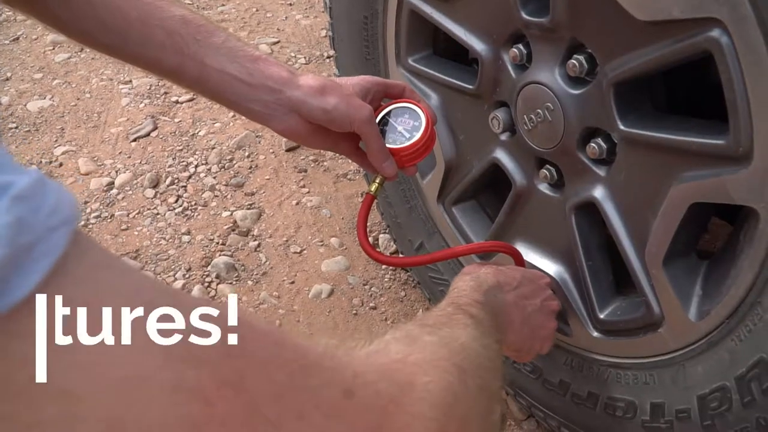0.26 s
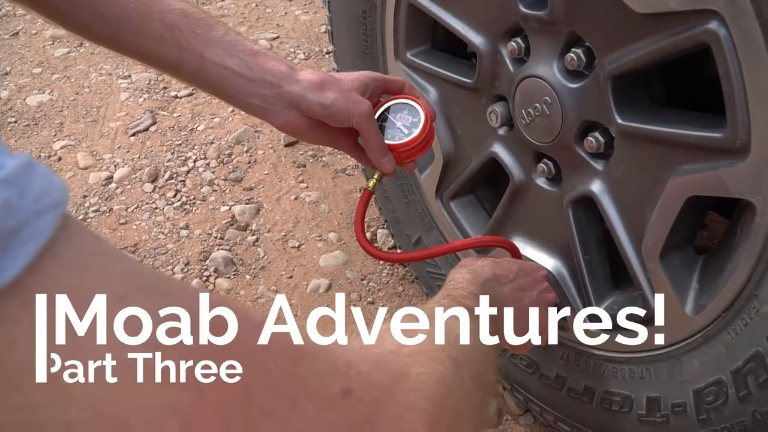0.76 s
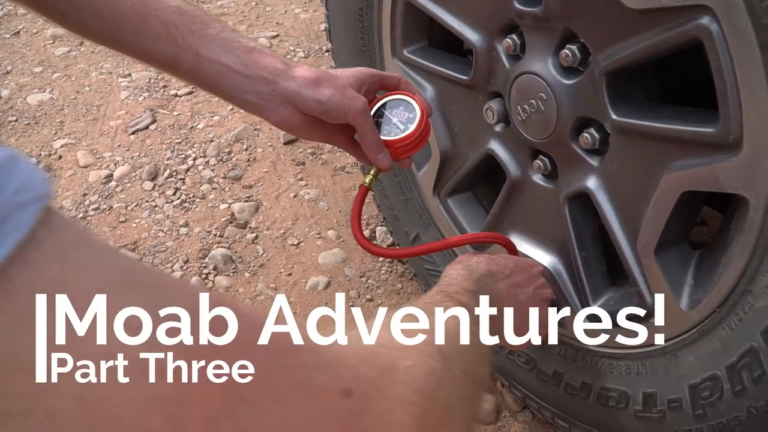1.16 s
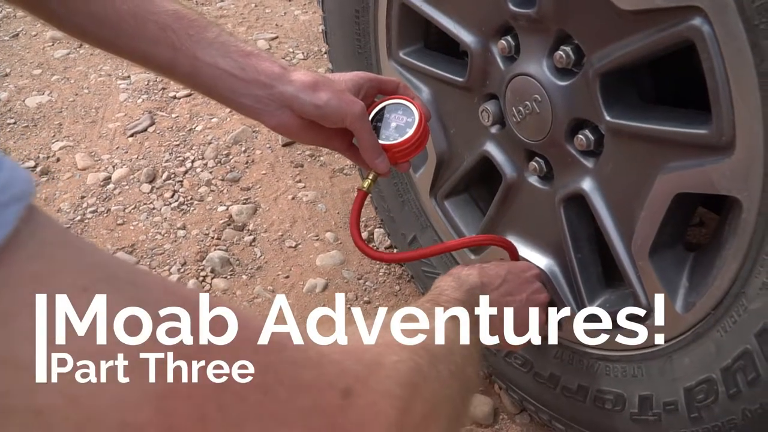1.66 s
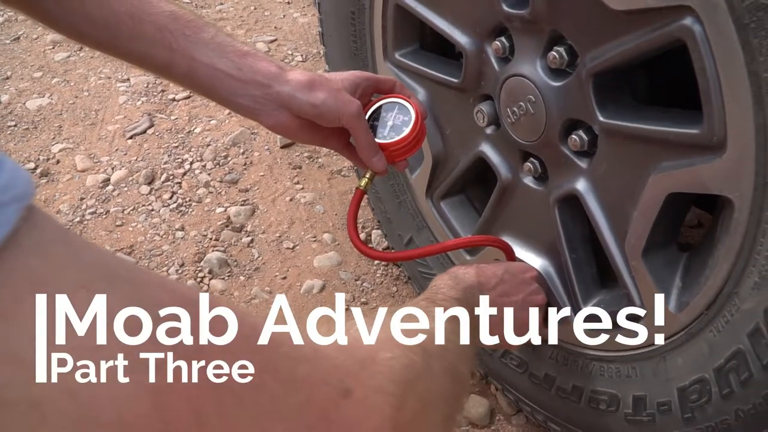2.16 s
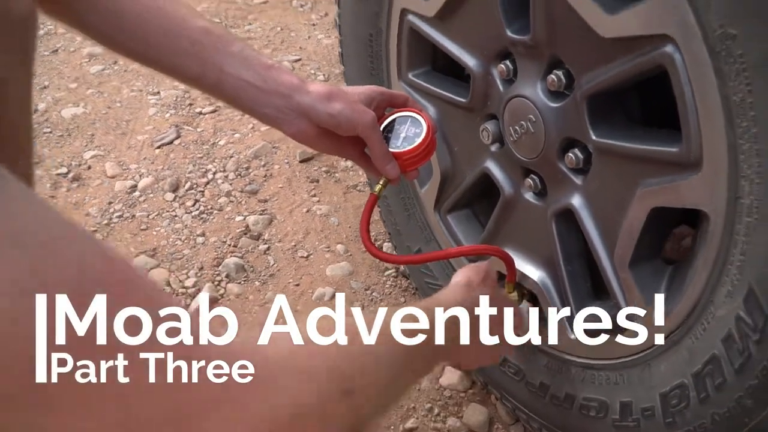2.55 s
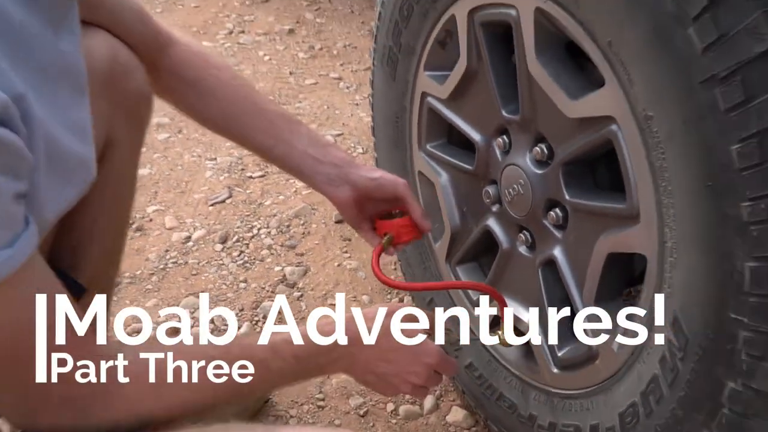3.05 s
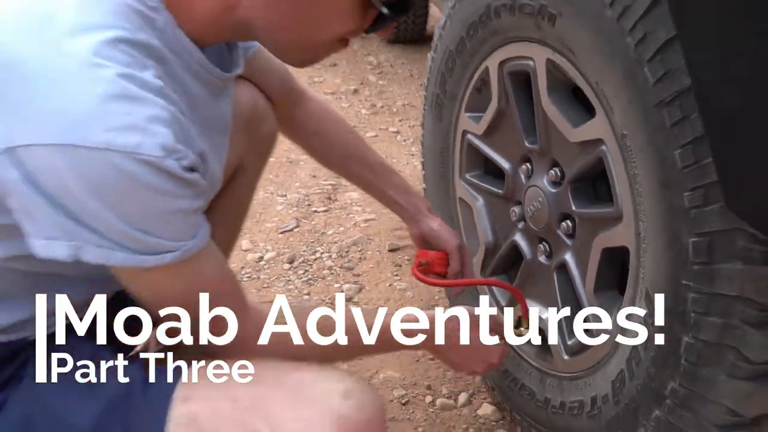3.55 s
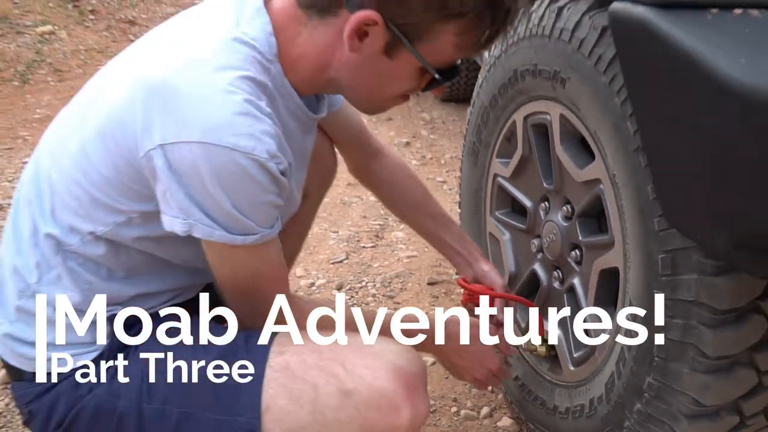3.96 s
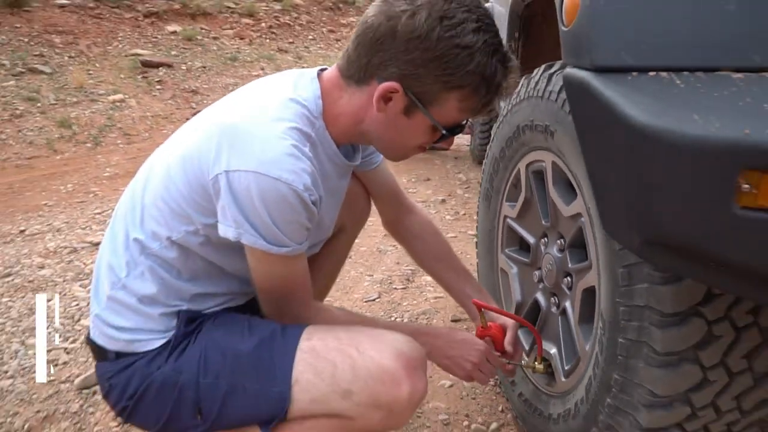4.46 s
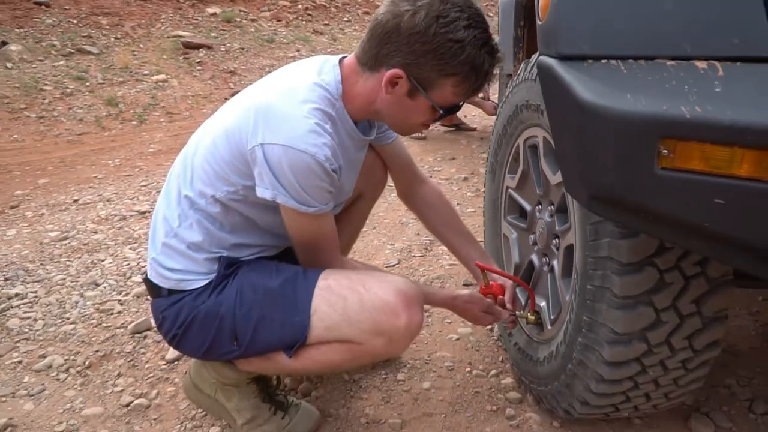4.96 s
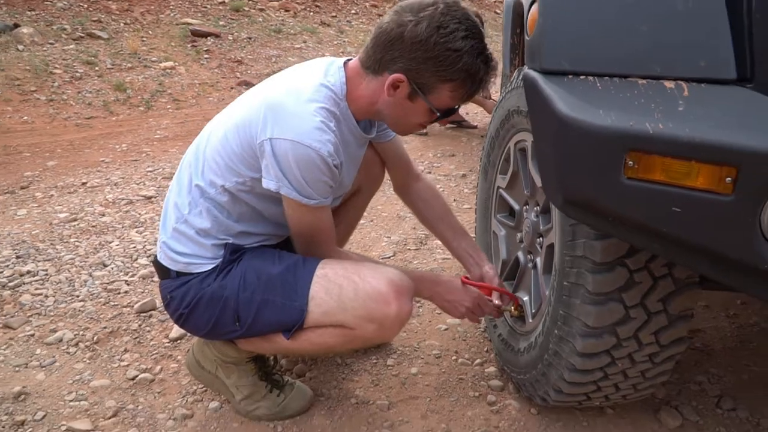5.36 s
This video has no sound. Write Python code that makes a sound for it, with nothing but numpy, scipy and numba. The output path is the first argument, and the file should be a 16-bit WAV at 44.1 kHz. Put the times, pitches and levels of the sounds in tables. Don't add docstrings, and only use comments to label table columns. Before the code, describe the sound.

Air rushes sharply out of a tyre, abruptly shrinks to a weak hiss, fingers click on brass, and a softer second hiss dies away outdoors.

```python
import sys
import numpy as np
from scipy import signal
from scipy.fft import rfft, irfft, next_fast_len
from scipy.io import wavfile
from scipy.ndimage import uniform_filter1d
from numba import njit

SR = 44100
rng = np.random.default_rng(int(sys.argv[2]) if len(sys.argv) > 2 else 0)


def convert_level_to_amplitude(level_db):
    exponent = np.asarray(level_db, float) / 20
    return 10 ** exponent


def dump_mix(stems):
    frames = np.atleast_2d(stems).T
    limited = np.clip(frames, -1, 1)
    pcm = np.round(limited * 32767).astype(np.int16)
    wavfile.write(sys.argv[1], SR, pcm)


N = 247621
TIME = np.arange(N) / SR
RING_TIME = np.arange(4096) / SR
SHUT_S = 1.617
REGION_EDGES_HZ = (6500, 10500, 13700)


def read(table, hold=False):
    s, *columns = np.transpose(table)
    inside = np.clip(np.minimum(TIME - s[0], s[-1] - TIME) / .03 + 1, 0, 1)
    return [np.interp(TIME, s, column) for column in columns] + [1. if hold else inside]


def unit(x):
    return x / np.sqrt(np.mean(x ** 2))


def coloured(shape, bumps=(), edges_hz=(), noise=None):
    if noise is None:
        noise = rng.standard_normal(N)
    size = next_fast_len(N, real=True)
    hz = np.fft.rfftfreq(size, 1 / SR) + 1e-3
    shape_hz, shape_db = np.transpose(shape)
    db = np.interp(np.log(hz), np.log(shape_hz), shape_db)
    db = db - 24 * np.clip(np.log2(shape_hz[0] / hz), 0, 5)
    grid = hz[::32]
    lift_db = np.zeros(len(grid))
    for centre, width, lift in bumps:
        lift_db += lift / (1 + (2 * (grid - centre) / width) ** 2)
    spectrum = rfft(noise, size) * convert_level_to_amplitude(db + np.interp(hz, grid, lift_db))
    below = [0] + [1 / (1 + (hz / edge) ** 12) for edge in edges_hz] + [1]
    return [irfft(spectrum * (b - a), size)[:N] for a, b in zip(below, below[1:])]


def walk(rate):
    k = int(SR / rate)
    steps = np.repeat(rng.standard_normal(N // k + 1), k)
    return 1.43 * uniform_filter1d(uniform_filter1d(steps, k), k)[:N]


@njit
def svf(x, hz, q):
    y, b, l, k = np.empty(len(x)), 0., 0., 1 / q
    for i in range(len(x)):
        g = np.tan(np.pi * hz[i] / SR)
        v = (b + g * (x[i] - l)) / (1 + g * (g + k))
        b, l, y[i] = 2 * v - b, l + 2 * g * v, k * v
    return y


def valve():
    return gush() + leak() + seep() + peep() + last_puff()


def gush():
    # t/s, level/dB
    flow = [
        (0.0, -22.5),
        (0.35, -20),
        (1.6, -20.5),
    ]
    # f/Hz, level/dB
    shape = [(150, -25.5), (300, -19.5), (700, -14), (1500, -16), (2400, -13), (3000, -19.5), (5500, -16),
             (8500, 0), (10500, -19), (12500, -12.5), (15600, -19)]
    # f/Hz, width/Hz, level/dB
    bore = [(279, 32, -6), (326, 15, 7.5), (761, 57, 5), (870, 34, -2.5), (983, 18, 5.5), (1170, 15, 2.5),
            (1970, 99, 5.5)]
    # f/Hz, width/Hz, early level/dB, late level/dB
    wheel = [(3160, 110, -4.5, -1.0), (3350, 90, 4.0, 4.0), (3760, 330, 5.5, 7.5), (4020, 470, -7.0, -9.0),
             (4840, 120, -3.5, -4.5), (5140, 200, -4.5, -8.0), (5320, 110, 5.0, 3.5), (5700, 170, 6.5, 4.5),
             (5900, 210, -6.0, -5.0), (6330, 140, 3.5, 6.0), (6340, 580, -9.0, -6.0), (6560, 180, 5.0, 2.0),
             (6740, 190, -5.5, -7.0), (7030, 250, -7.5, -8.0), (7160, 160, 1.0, 4.5),
             (7400, 550, -8.0, -11.5), (7930, 210, -8.5, -6.0), (8520, 490, -13.5, -13.5),
             (8960, 760, 4.5, 7.0), (9080, 140, -9.5, -14.0), (9410, 420, -10.5, -4.5),
             (9610, 200, 9.5, -3.5), (9820, 200, -0.5, 4.0), (10040, 200, 1.5, -2.5),
             (10330, 470, 7.5, 8.0), (10350, 130, -9.5, -6.0), (10710, 220, 6.5, -5.0),
             (10930, 210, -4.5, 3.0), (11170, 150, 3.0, -2.0), (11290, 380, 2.5, 4.0),
             (11830, 210, 2.0, -2.5), (12100, 430, 7.0, 3.0), (12480, 100, 0.0, 2.5),
             (13050, 430, 5.5, 6.5), (13890, 900, 3.5, 9.0), (14030, 300, -2.0, -11.5),
             (14610, 130, -7.0, -1.5), (14750, 220, -1.5, -6.5), (15370, 350, -1.5, -3.5),
             (15600, 180, 0.5, 3.0)]
    bands = creeping(shape, bore, wheel, (0, 1.6))
    sound = jet(flow, bands, (-3.5, -.4, -7.6), np.zeros(3),
                flutter_db=.5, flicker_db=.15, haze_db=-17, hold=True)
    late = np.clip(TIME - SHUT_S, 0, None)
    fall, tail = np.exp(-late / .0012), convert_level_to_amplitude(-13.5) * np.exp(-late / .064)
    return sound * np.maximum(fall, tail)


def leak():
    # t/s, level/dB
    flow = [
        (1.63, -36),
        (1.89, -33.5),
        (2.41, -33),
        (2.63, -38.5),
        (2.79, -47.5),
        (2.88, -50.5),
        (2.9, -55),
    ]
    # f/Hz, level/dB
    shape = [(150, -25), (300, -15), (700, -28), (1500, -24.5), (2400, -15), (3000, -7.5), (5500, -15),
             (8500, 0), (10500, -2.5), (12500, -2), (15600, -15)]
    # f/Hz, width/Hz, level/dB
    bore = [(1145, 120, 11), (2240, 250, 1.5)]
    # f/Hz, width/Hz, early level/dB, late level/dB
    wheel = [(2820, 150, -3.5, -5.0), (2960, 100, 6.5, 3.0), (3210, 560, -4.0, -1.5), (3760, 580, 3.0, 4.5),
             (4480, 90, -1.5, -6.0), (4580, 100, 6.0, 4.5), (4910, 130, 6.0, 6.5), (5270, 230, 5.5, 3.0),
             (6190, 170, -6.5, -6.0), (6710, 150, 3.0, 3.0), (6850, 110, -5.5, -4.0), (7230, 160, 2.0, 5.5),
             (8060, 900, -13.0, -14.0), (8070, 310, 14.0, 13.0), (8530, 160, 5.5, 3.5),
             (8640, 320, -2.0, -4.5), (9070, 90, -3.5, -1.5), (9540, 230, -8.5, -9.5),
             (9860, 110, 0.5, 4.0), (10020, 90, -8.5, -4.5), (11010, 590, -6.0, -7.0),
             (11980, 200, 3.5, 4.0), (12320, 170, 4.5, 4.5), (12420, 180, -4.0, -2.5),
             (13170, 250, -5.0, -6.5), (13710, 160, -6.5, -5.5), (14190, 370, -10.0, -8.0),
             (14450, 900, 4.0, 5.0), (14560, 100, -5.0, -6.0), (15110, 680, -6.5, -6.0)]
    bands = creeping(shape, bore, wheel, (1.68, 2.52))
    return jet(flow, bands, (-3, .44, -7), (.37, .028, .55), flutter_db=.6, flicker_db=.25, haze_db=-15)


def seep():
    # t/s, level/dB
    flow = [
        (3.55, -58),
        (3.56, -45),
        (3.6, -38.5),
        (3.75, -35.5),
        (4.18, -34),
        (4.68, -34.5),
    ]
    # f/Hz, level/dB
    shape = [(150, -16), (300, -18.5), (700, -17), (1500, -15.5), (2400, -13), (3000, -4), (5500, -18.5),
             (8500, 0), (10500, -19), (12500, -5), (15600, -21.5)]
    # f/Hz, width/Hz, level/dB
    bore = [(1900, 300, 5), (2400, 116, -1)]
    # f/Hz, width/Hz, early level/dB, late level/dB
    wheel = [(2540, 170, 5.5, 2.0), (2680, 290, -2.5, -5.5), (3130, 90, -7.0, -6.0), (3350, 460, 0.5, -4.0),
             (3880, 90, -1.5, -6.5), (4620, 110, 3.5, 6.5), (4900, 210, 8.0, 5.0), (5640, 880, 11.5, 14.0),
             (5780, 240, -7.0, -8.0), (6540, 300, -1.0, -6.5), (7000, 120, -2.5, -4.0),
             (7240, 130, 3.5, 3.0), (7530, 260, -4.0, -6.0), (8290, 90, -4.5, -3.5), (8840, 90, 2.5, 4.5),
             (9090, 520, -3.0, -7.0), (9480, 140, -2.0, -5.0), (9610, 120, -0.5, 5.5),
             (10020, 170, -0.5, -7.5), (10160, 730, 7.0, 10.5), (10650, 240, -0.5, 6.5),
             (11520, 200, -3.5, -2.5), (12380, 220, -7.0, 2.0), (12680, 90, 2.5, -7.0),
             (12860, 150, -7.5, 4.5), (13900, 120, 3.5, -5.5), (14240, 510, 4.0, 3.5),
             (15650, 900, 3.0, 6.0)]
    bands = creeping(shape, bore, wheel, (3.78, 4.66))
    return jet(flow, bands, (-2, -8, -7), (.22, .05, .25), flutter_db=.45, flicker_db=.35, haze_db=-15)


def peep():
    peak_s, length_s, whistle_hz, level_db = 3.85, .26, 11950., -41
    whistle = unit(svf(rng.standard_normal(N), np.full(N, whistle_hz), 45.))
    return whistle * convert_level_to_amplitude(level_db) * np.exp(-(2 * (TIME - peak_s) / length_s) ** 2)


def last_puff():
    # t/s, level/dB
    flow = [
        (4.71, -38.5),
        (4.77, -41.5),
        (4.9, -42),
        (5.035, -44.5),
        (5.052, -52),
        (5.095, -58),
        (5.18, -62),
        (5.39, -64),
        (5.42, -79),
    ]
    # f/Hz, level/dB
    shape = [(1500, -6.5), (3000, -12.5), (4500, -8.5), (6300, -9), (8500, -8), (10500, -10.5), (12500, 3),
             (15600, -9)]
    # f/Hz, width/Hz, level/dB
    wheel = [(3210, 350, 7.5), (5485, 540, 5.5), (6040, 150, 6), (6420, 190, -3.8), (8330, 530, 11.5),
             (8880, 200, 8), (9670, 350, 3), (10390, 620, 8), (13080, 210, 5), (13520, 160, 4.5)]
    bands = [unit(band) for band in coloured(shape, wheel, REGION_EDGES_HZ)]
    return jet(flow, bands, (-2.5, -2.5, -9), (-.1, -.13, .01), flutter_db=-1.3, flicker_db=.2, haze_db=-12)


def jet(flow, bands, mix_db, tilt, flutter_db, flicker_db, haze_db, hold=False):
    flow_db, inside = read(flow, hold)
    lost_db = flow_db.max() - flow_db
    body, whistle, sizzle, air = bands
    body = body * hand()
    sound = whistle * convert_level_to_amplitude(flicker_db * walk(31))
    for band, db, gain in zip((body, sizzle, air), mix_db, tilt):
        sound = sound + band * convert_level_to_amplitude(db + gain * lost_db + flicker_db * walk(15))
    sound = signal.fftconvolve(sound, scatter(haze_db, .0048))[:N]
    return sound * convert_level_to_amplitude(flow_db + flutter_db * walk(44.67)) * inside


def creeping(shape, bore, wheel, span_s):
    noise = rng.standard_normal(N)
    share = np.interp(TIME, span_s, (0, 1))
    early_bumps = bore + [(hz, width, early_db) for hz, width, early_db, _ in wheel]
    late_bumps = bore + [(hz, width, late_db) for hz, width, _, late_db in wheel]
    early = coloured(shape, early_bumps, REGION_EDGES_HZ, noise)
    late = coloured(shape, late_bumps, REGION_EDGES_HZ, noise)
    heard = slice(int(span_s[0] * SR), int(span_s[1] * SR))
    bands = [(1 - share) * a + share * b for a, b in zip(early, late)]
    return [band / np.std(band[heard]) for band in bands]


def hand():
    # t/s, level/dB, length/s
    moves = [
        (0.0, 3.5, 0.58),
        (2.46, 1.5, 0.1),
        (3.751, -4.5, 0.11),
        (4.18, 3, 0.26),
        (4.626, -3, 0.14),
        (4.982, 4, 0.082),
    ]
    t = np.arange(0, N, 64) / SR
    lift_db = sum(db * np.exp(-(2 * (t - s) / length) ** 2) for s, db, length in moves)
    return np.interp(TIME, t, convert_level_to_amplitude(lift_db))


def scatter(db, fade_s):
    haze = rng.standard_normal(len(RING_TIME)) * np.exp(-RING_TIME / fade_s) * (RING_TIME > .002)
    haze *= convert_level_to_amplitude(db) / np.sqrt(np.sum(haze ** 2))
    return np.append(1, haze[1:])


def handling():
    out = np.zeros(N + len(RING_TIME))
    for touch in (ticks, grit, knocks, clear_rings):
        for s, sound in touch():
            out[int(s * SR):][:len(sound)] += sound
    return out[:N]


def ticks():
    # t/s, low level/dB, low f/Hz, high f/Hz, high level/dB
    taps = [(2.7615, -21, 1600, 2600, -40), (2.9061, -19.5, 2200, 3500, -19),
            (2.9095, -25, 2300, 3500, -23), (2.9135, -32, 1300, 3300, -28), (3.0847, -30, 1500, 4600, -31),
            (3.104, -33, 600, 4300, -21.5), (3.1214, -15, 1900, 4600, -18.5),
            (3.2512, -18, 1450, 2500, -27), (3.2892, -23, 1600, 4000, -34), (3.3516, -21, 1300, 3200, -24),
            (4.9862, -23.5, 1300, 2600, -36), (4.9972, -29, 720, 3600, -34), (5.0921, -27, 1400, 3000, -42),
            (5.1132, -30, 1270, 2800, -42), (5.1254, -19, 800, 2000, -22.5), (5.13, -34, 1000, 2600, -30),
            (5.3852, -21.5, 1150, 2900, -50)]
    t60_s = .04
    for s, low_db, low_hz, high_hz, high_db in taps:
        tick = convert_level_to_amplitude(low_db) * ring(low_hz, t60_s, q=1.2, rattle_db=-29)
        tick += convert_level_to_amplitude(high_db) * ring(high_hz, .8 * t60_s, q=1.3, rattle_db=-19)
        if low_hz < 2000:
            tick += convert_level_to_amplitude(low_db - 14) * ring(550, t60_s, q=1., rattle_db=-28)
        yield s, tick


def grit():
    # t/s, peak level/dB, f/Hz
    grains = [(2.9563, -40, 3150), (2.994, -33, 7300), (3.0104, -34, 5800), (3.151, -33, 950),
              (3.1668, -30, 1800), (3.1963, -33, 2700), (3.214, -27, 2900), (3.2393, -45, 1560),
              (3.2653, -35, 2900), (3.3063, -29, 1820), (3.3985, -27, 1800), (3.4028, -34, 2700),
              (3.186, -36, 2200), (3.28, -36, 2600), (3.4432, -25, 1000), (5.137, -32, 8000),
              (5.1553, -35, 2800), (5.163, -34, 8000), (5.1943, -35, 3340), (5.259, -40, 5500),
              (5.3216, -31, 1420)]
    for s, db, hz in grains:
        rattle_db = -20 if hz > 2300 else -27
        yield s, convert_level_to_amplitude(db) * ring(hz, .046, q=1 + hz / 4000, rattle_db=rattle_db)


def knocks():
    # t/s, peak level/dB, f/Hz
    bumps = [(1.681, -35, 302), (2.612, -38, 375), (2.73, -38, 159), (2.111, -31, 600), (2.594, -42, 480),
             (2.688, -31, 1900), (2.71, -29, 1550), (2.8745, -34, 1490), (2.84, -45, 1400),
             (2.808, -36, 1500), (2.738, -28, 1500), (2.779, -30, 1380), (2.798, -26, 1470),
             (2.823, -24, 1390), (3.586, -27, 1330), (3.76, -39, 480), (3.868, -30, 466),
             (3.897, -30.5, 1320), (3.957, -27, 1190), (4.174, -32, 530), (4.362, -38, 615),
             (4.963, -35, 955)]
    lag_s = .0013
    for s, db, hz in bumps:
        q = 6. if hz < 400 else 2.6
        yield s + lag_s, convert_level_to_amplitude(db + 1) * ring(hz, .13, q=q, rattle_db=-28)


def clear_rings():
    # t/s, peak level/dB, f/Hz, t60/s
    tones = [(2.7605, -20, 1550, .03), (2.9063, -23, 2250, .032), (2.9063, -25, 3500, .028),
             (2.9063, -30, 1250, .04), (3.0848, -35, 4700, .03), (3.1041, -30, 3600, .026),
             (3.1041, -33, 6000, .022), (3.1216, -26, 2000, .022), (3.1216, -30, 4200, .022),
             (3.2893, -34, 1000, .03), (3.3517, -28, 1750, .022), (3.3517, -31, 2650, .022),
             (3.2514, -27, 1100, .025), (5.1133, -30, 1250, .03), (5.1256, -26, 600, .03),
             (5.3583, -35, 1000, .06), (5.3854, -31, 1250, .06)]
    for s, db, hz, t60 in tones:
        decay = np.exp(-np.log(1000) * RING_TIME / t60)
        onset = 1 - np.exp(-RING_TIME * hz)
        yield s, convert_level_to_amplitude(db) * np.sin(2 * np.pi * hz * RING_TIME) * decay * onset


def ring(hz, t60, q, rattle_db):
    decay = np.exp(-np.log(1000) * RING_TIME / t60)
    push = convert_level_to_amplitude(rattle_db) * rng.standard_normal(len(RING_TIME)) * decay * (RING_TIME > .0005)
    push[0] = 1
    push[int(.0016 * SR)] -= .35
    push = signal.sosfilt(signal.butter(2, min(2.2 * hz, 12000), fs=SR, output="sos"), push)
    centre = np.full(len(RING_TIME), 1. * hz)
    sound = svf(svf(push, centre, q), centre, .8)
    return sound / np.abs(sound).max()


def gravel():
    # heaviest moment t/s, level/dB, centre f/Hz, length/s
    scuffs = [(2.033, -42.5, 725, 0.06), (2.6, -45, 493, 0.2), (2.772, -42, 616, 0.18),
              (2.713, -40, 1560, 0.1), (2.792, -37.5, 1710, 0.071), (2.86, -47, 1450, 0.11),
              (3.398, -50, 3000, .04), (3.466, -62, 6000, .1), (5.197, -56, 4200, 0.021),
              (5.252, -55, 4488, .04), (5.362, -52, 4500, .035), (3.261, -49, 1647, 0.37),
              (3.473, -43.5, 850, 0.19), (3.622, -41, 1236, 0.16), (4.966, -40.5, 1000, 0.11),
              (5.142, -45.5, 1400, 0.16), (5.376, -52, 1100, 0.06)]
    grains_per_s, puff_s = 420, .0043
    edge_db = -10.5
    out = np.zeros(N + SR)
    t = np.arange(SR // 2) / SR - .25
    for s, db, hz, length in scuffs:
        chance = rng.random((2, len(t)))
        size_db = np.minimum(-2.2 * np.log(chance[1] + 1e-9), 5)
        sizes = (chance[0] < grains_per_s / SR) * convert_level_to_amplitude(size_db)
        puffs = signal.lfilter([1], [1, -np.exp(-1 / (puff_s * SR))], sizes)
        rustle = (puffs + .8) * rng.standard_normal(len(t))
        centre = np.full(len(t), 1. * hz)
        stones = unit(svf(svf(rustle, centre, 1.9), centre, .8))
        out[int((s + t[0]) * SR):][:len(t)] += stones * convert_level_to_amplitude(db + edge_db * (2 * t / length) ** 2)
    return out[:N]


def engine():
    # t/s, firing f/Hz, level/dB
    idle = [
        (0.85, 98.4, -71.5),
        (0.97, 103.4, -54),
        (1.06, 105.5, -54.5),
        (1.6, 114, -51.5),
        (2.01, 117.5, -48),
        (3.34, 117.7, -50.5),
        (3.77, 119.9, -50.5),
        (5.6, 119.2, -54.5),
    ]
    hz, db, _ = read(idle)
    phase = 2 * np.pi * np.cumsum(hz * (1 + .006 * walk(9.1))) / SR
    onset = np.clip((TIME - idle[0][0]) / .13, 0, 1)
    firing = np.sqrt(2) * np.sin(phase) * convert_level_to_amplitude(1.2 * walk(8) - 1)
    lower = convert_level_to_amplitude(-10.5) * unit(svf(rng.standard_normal(N), hz * 2 / 3, 7.))
    upper = convert_level_to_amplitude(-11) * unit(svf(rng.standard_normal(N), hz * 4 / 3, 12.))
    return (firing + lower + upper) * convert_level_to_amplitude(db) * onset


def wind():
    # strongest moment t/s, level/dB
    gusts = [(.22, -49), (.46, -45), (1.1, -52), (1.94, -47), (2.091, -47), (2.33, -33), (2.6, -41),
             (2.91, -37.5), (3.2, -41.5), (3.49, -33.5), (3.63, -36.5), (4.01, -31.5), (4.4, -36),
             (4.66, -39), (4.83, -37.5), (5.26, -37), (5.52, -28)]
    calm_db, rise_db_s, fall_db_s = -55.5, 64, 52
    db = np.full(N, calm_db)
    for s, top_db in gusts:
        drop_db = np.where(TIME < s, rise_db_s * (s - TIME), fall_db_s * (TIME - s))
        db = np.maximum(db, top_db - drop_db)
    swings = unit(coloured([(7, -3.5), (12, 0.5), (18, -6.5), (26, -20.5), (45, -43), (120, -95)])[0])
    return swings * convert_level_to_amplitude(db)


def open_air():
    # f/Hz, level/dB per Hz
    shape = [(30, -17), (55, 1.5), (110, -1.5), (300, -1), (750, -3.5), (1300, -8), (2000, -9.5),
             (2900, -11), (3500, -15.5), (5000, -18), (7400, -14), (10500, -25.5), (13500, -17.5),
             (15600, -20)]
    low, mid, high = coloured(shape, edges_hz=(400, 3200))
    scale = convert_level_to_amplitude(-43) / np.std(low + mid + high)
    lull_db = -14 * np.clip(TIME - 5.42, 0, None)
    low = low * convert_level_to_amplitude(1.5 * walk(8.2))
    mid = mid * convert_level_to_amplitude(.47 * walk(21))
    high = high * convert_level_to_amplitude(-4.5 + lull_db) * convert_level_to_amplitude(1.5 * walk(8.5))
    return scale * (low + mid + high)


def far_tyre():
    level_db, stops_s, fall_s = -58, 4.6, .55
    shape = [(3500, 5), (8500, 1), (10500, -12), (13000, -4), (15600, -24)]
    peaks = [(11700, 300, 5), (12800, 300, 5), (13900, 400, 5)]
    hiss = unit(coloured(shape, peaks)[0])
    late = np.clip(TIME - stops_s, 0, None)
    return hiss * convert_level_to_amplitude(level_db + 1.3 * walk(4.85)) * np.exp(-(late / fall_s) ** 2)


def scene():
    duck_db, recover_s = -6, .74
    late = np.clip(TIME - SHUT_S, 0, None)
    duck = convert_level_to_amplitude(duck_db * np.exp(-late / recover_s))
    background = duck * (open_air() + far_tyre())
    mono = valve() + handling() + gravel() + engine() + wind() + background
    return np.array([mono, mono])


def top_cut(x):
    return signal.sosfilt(signal.butter(12, 16450, fs=SR, output="sos"), x)


def record(dry):
    # t/s, low f/Hz, high f/Hz
    wide = [(1.31, 8900, 10500), (1.31, 11700, 13300), (1.59, 12400, 14000), (2.005, 4100, 5500),
            (2.005, 5700, 7100), (2.865, 7600, 9100), (2.865, 9600, 11200), (3.70, 13100, 14600),
            (4.68, 13800, 15300)]
    mono = signal.sosfilt(signal.ellip(20, .2, 100, 15730, fs=SR, output="sos"), dry[0])
    side, frame = np.zeros(N), np.hanning(2048)
    for s, low_hz, high_hz in wide:
        start = int(s * SR) - len(frame) // 2
        earlier = mono[start - len(frame):start] * frame
        band = signal.ellip(6, .5, 60, [low_hz, high_hz], "band", fs=SR, output="sos")
        side[start:start + len(frame)] += .8 * signal.sosfilt(band, earlier)
    return top_cut(np.array([mono + side, mono - side]))


dry = scene()
out = record(dry)
dump_mix(out)
```